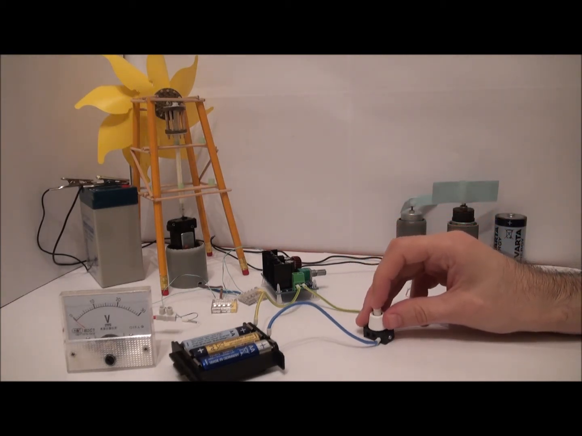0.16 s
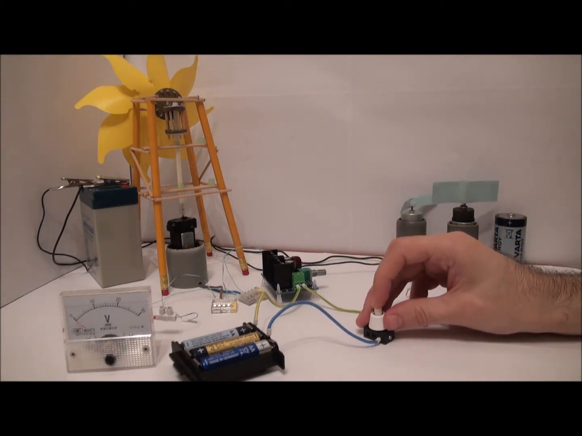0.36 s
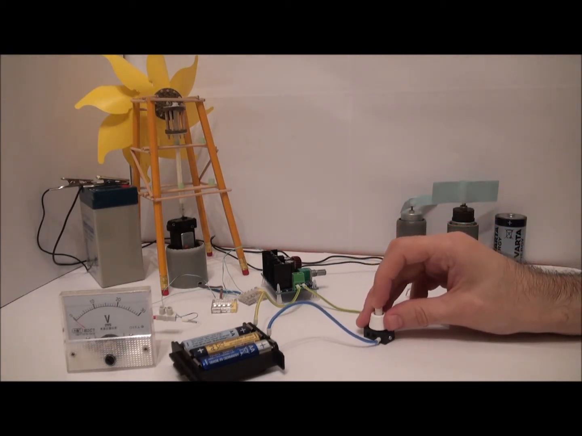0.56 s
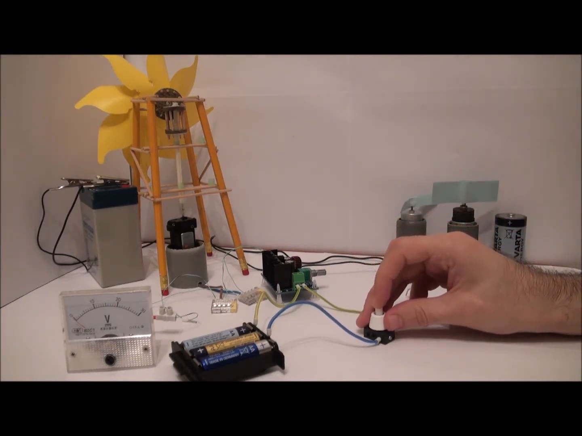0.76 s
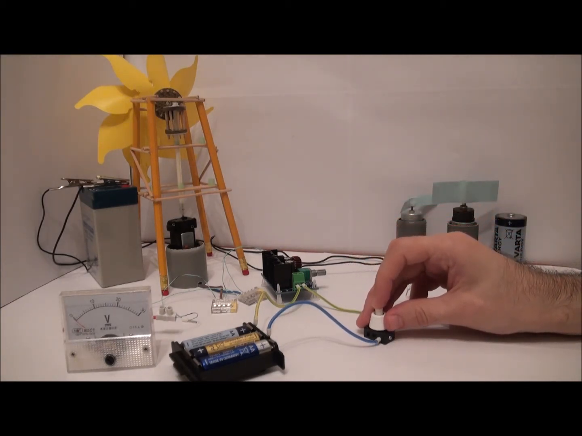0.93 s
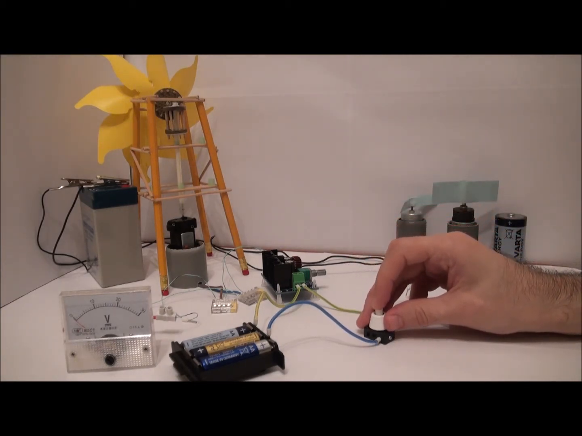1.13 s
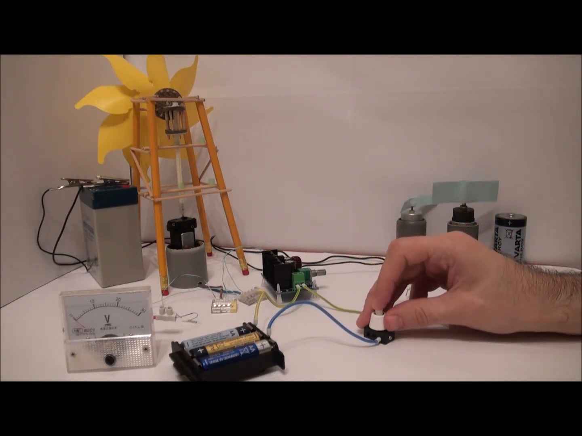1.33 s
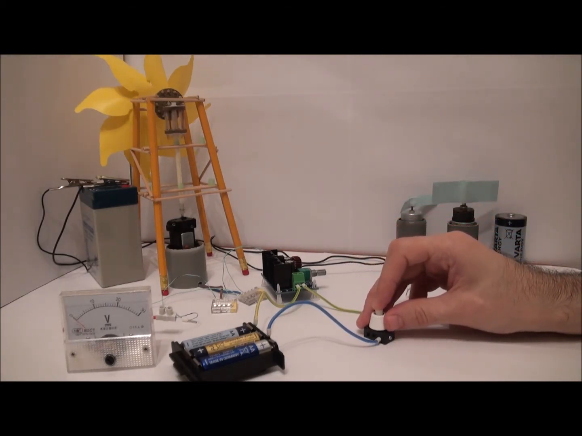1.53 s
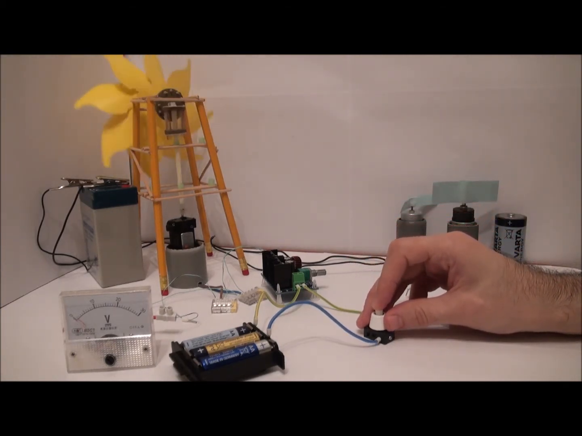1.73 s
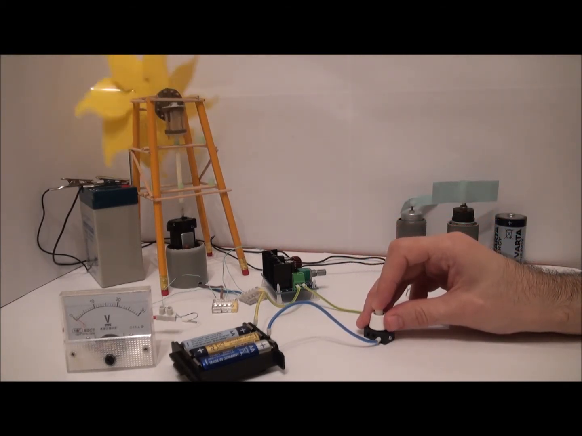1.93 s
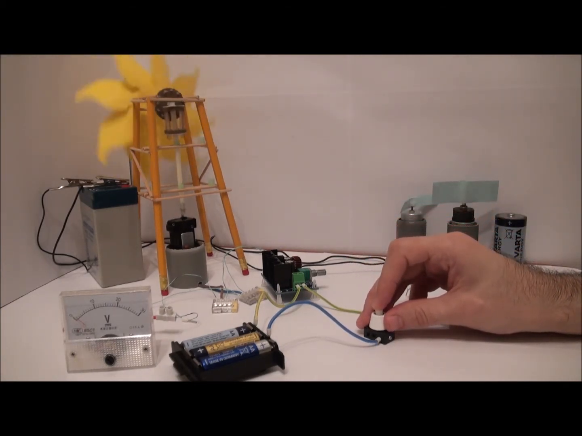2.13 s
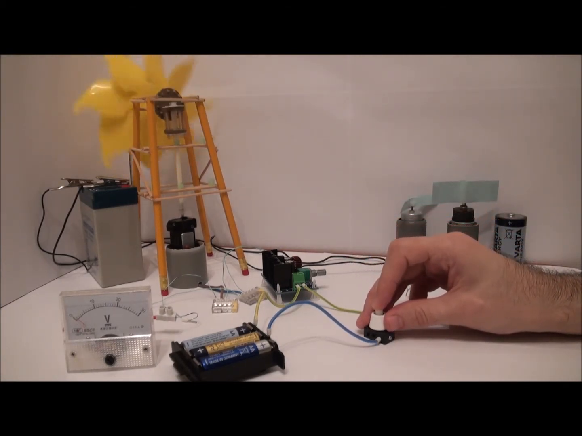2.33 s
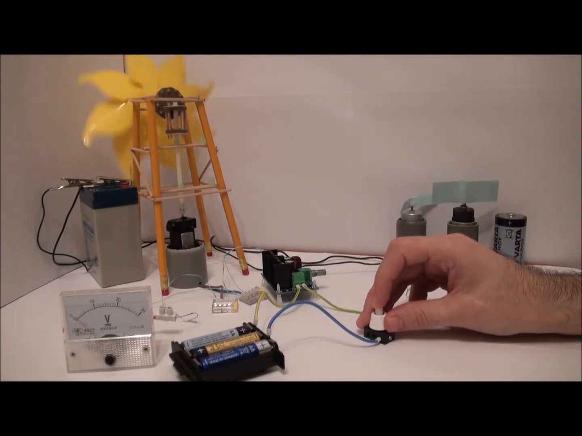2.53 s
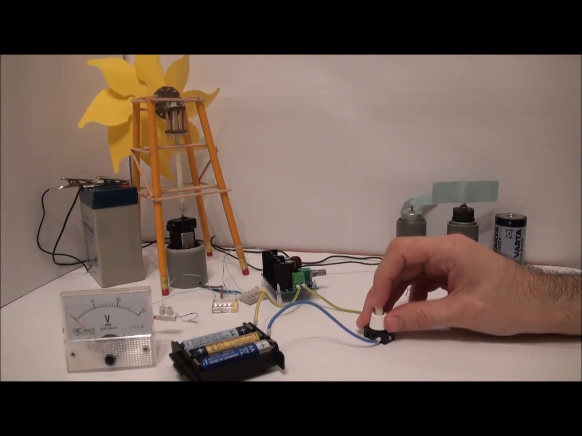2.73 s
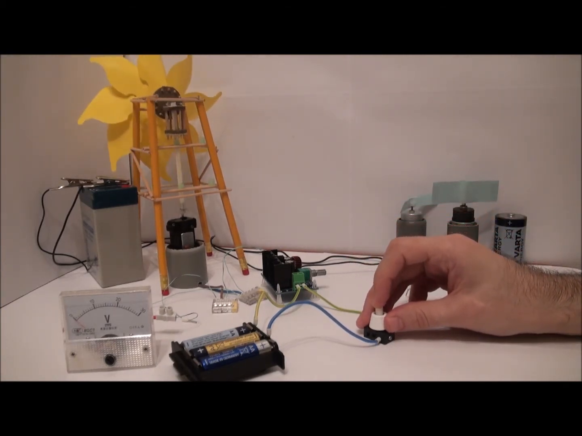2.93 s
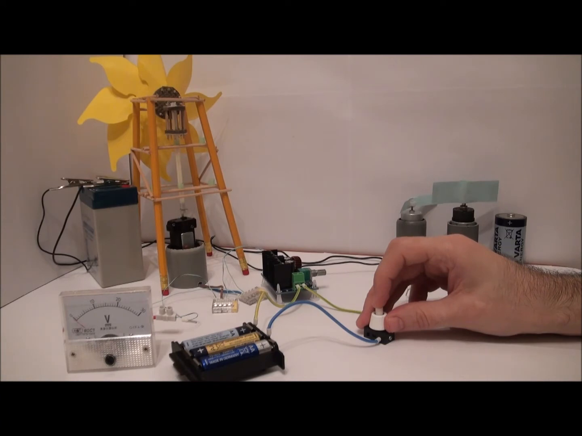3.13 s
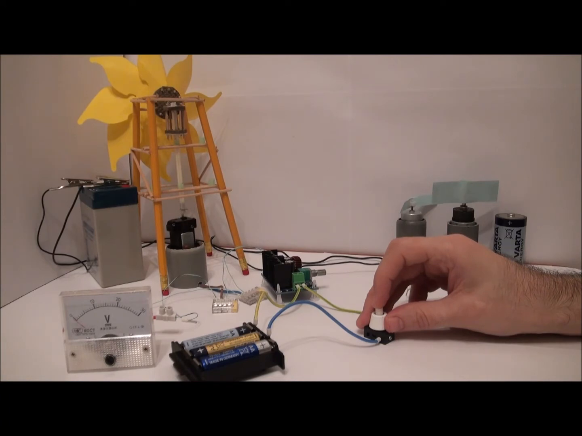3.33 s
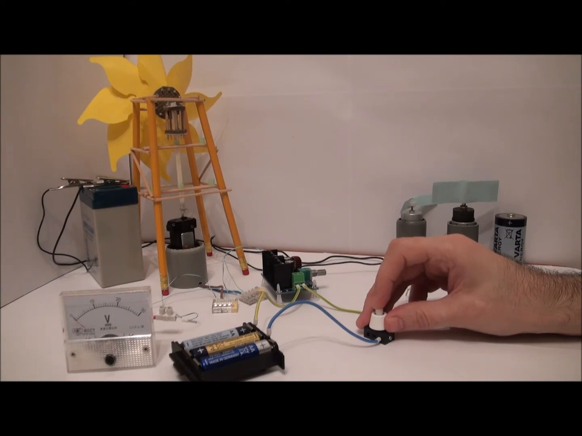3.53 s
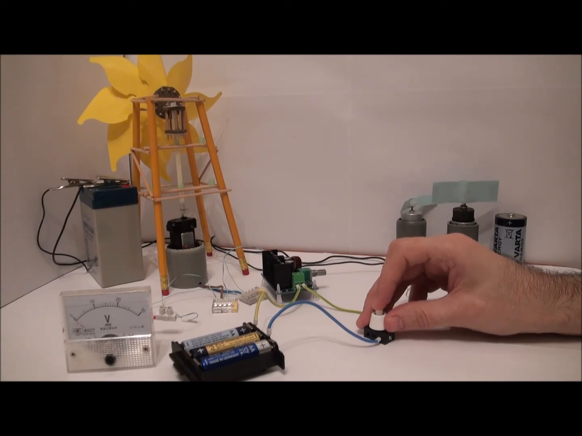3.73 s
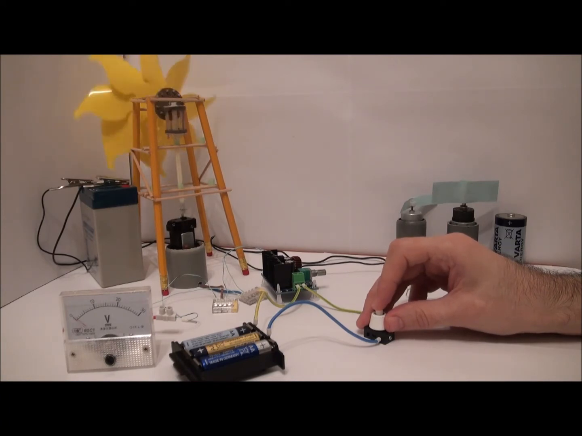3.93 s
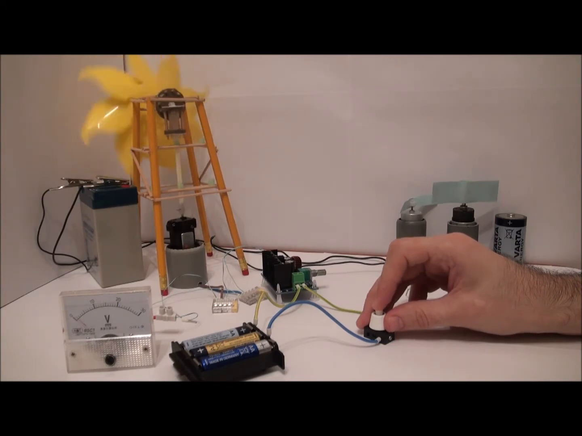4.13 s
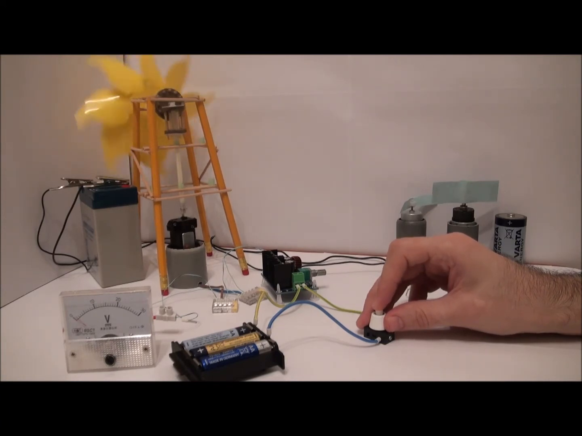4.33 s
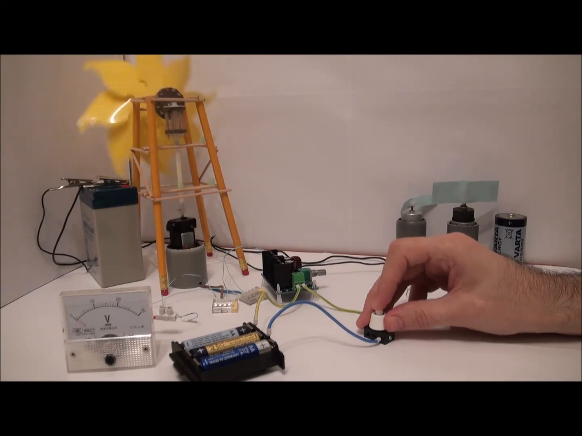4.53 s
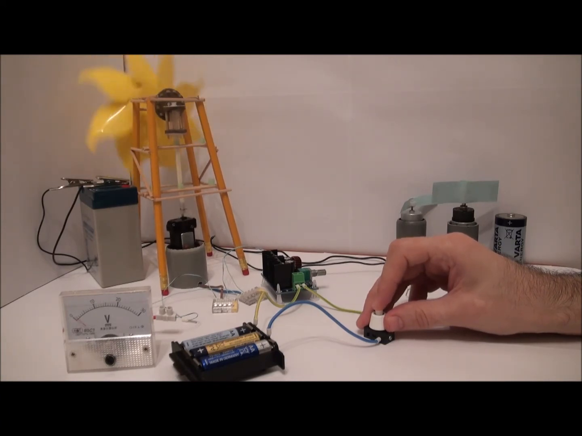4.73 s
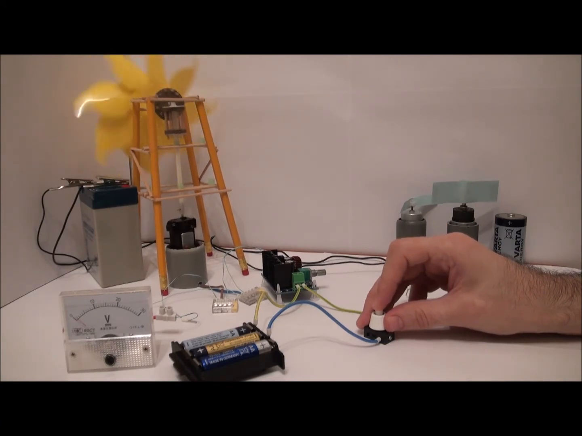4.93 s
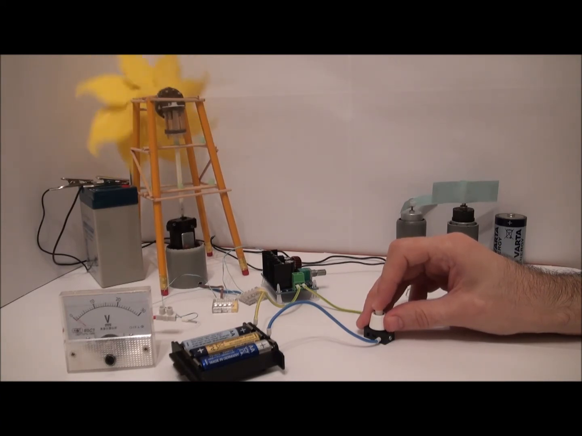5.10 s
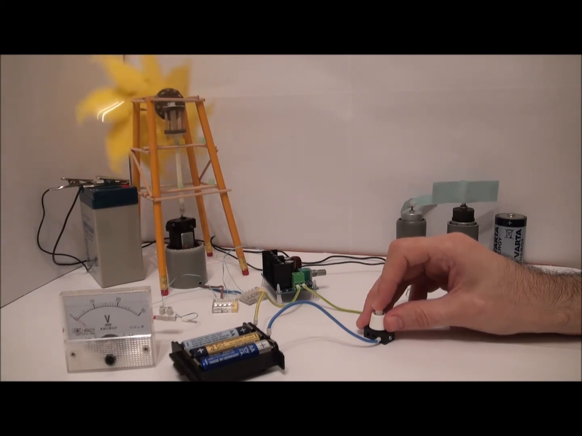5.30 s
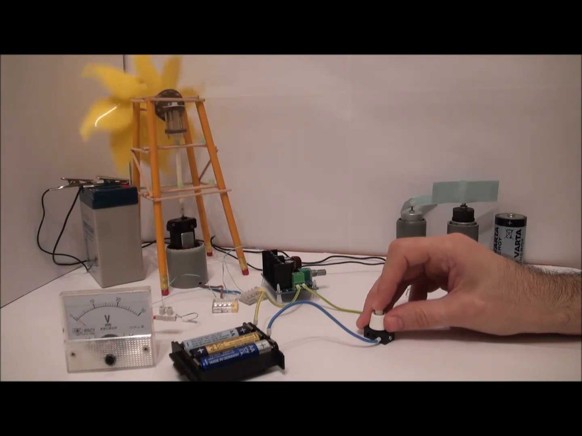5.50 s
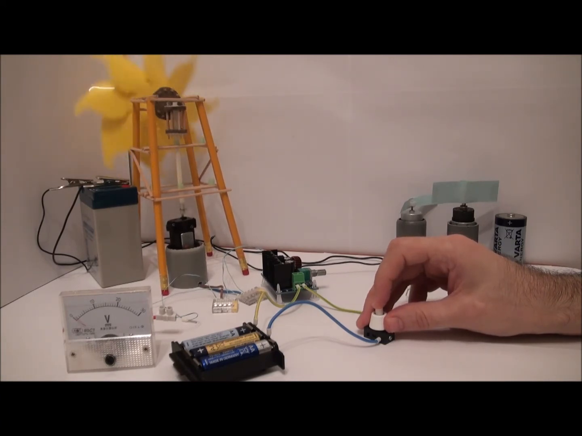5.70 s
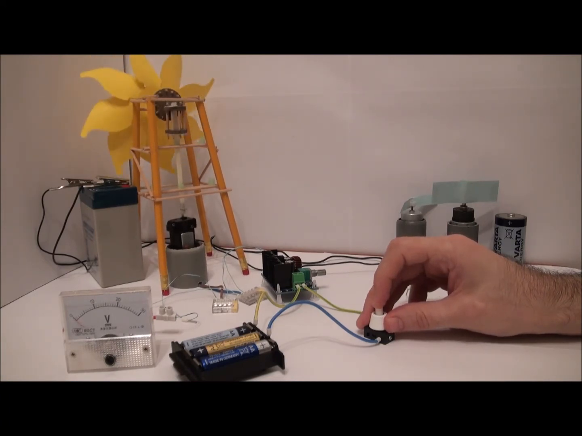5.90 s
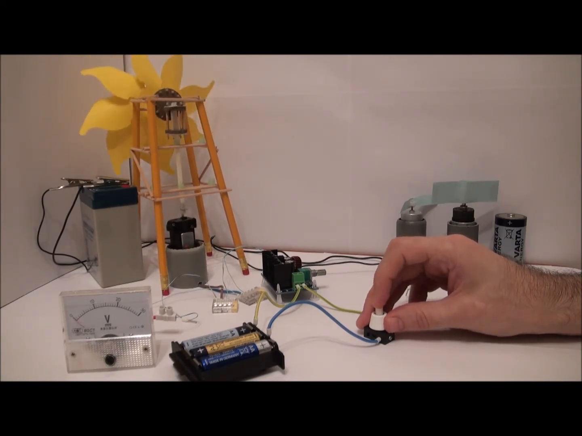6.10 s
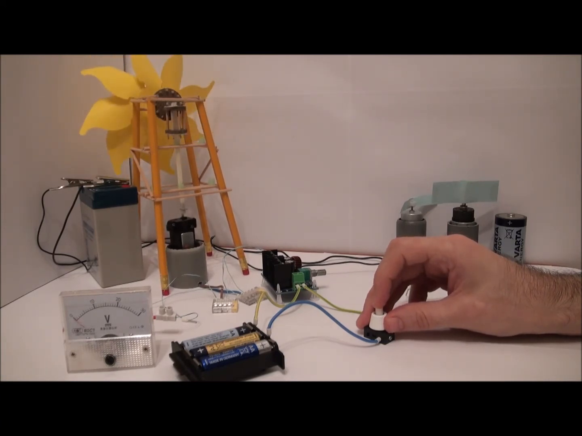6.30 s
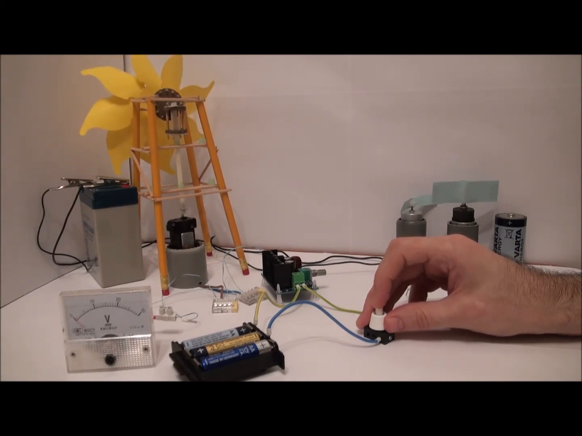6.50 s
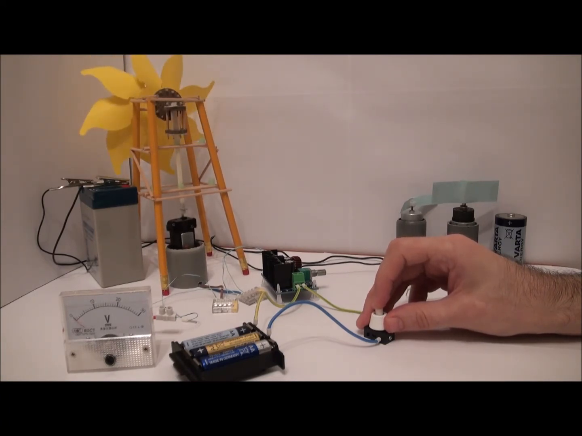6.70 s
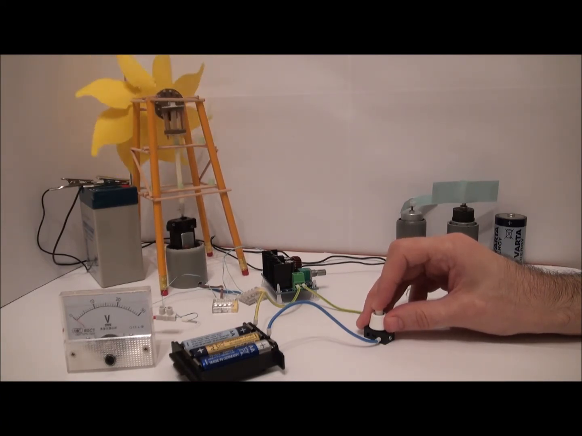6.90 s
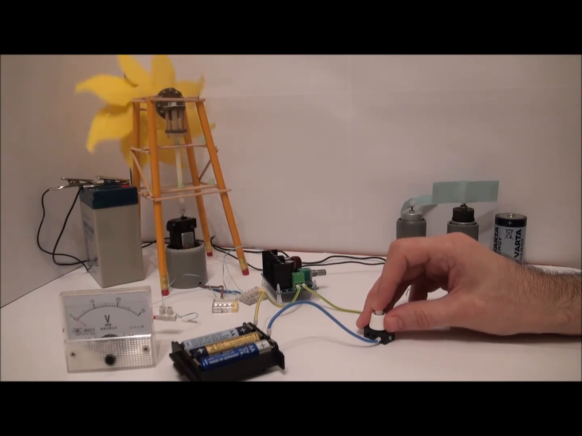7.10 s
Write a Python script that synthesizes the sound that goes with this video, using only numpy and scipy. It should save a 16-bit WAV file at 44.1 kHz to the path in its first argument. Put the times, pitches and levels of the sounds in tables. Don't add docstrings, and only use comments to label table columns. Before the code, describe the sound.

Close camera sound with steady hiss and a thin drive whine. A hand nudges a switch with dull little thumps, and slack plastic gears burst into bright, rough chattering with random cracks, hollow case ringing and a low table drone. Three runs: one second, nearly two seconds, then a brief one still running at the end. Each starts fast and coasts down quickly, with short room reflections.

```python
import sys
import numpy as np
from scipy import signal
from scipy.fft import rfft, irfft, next_fast_len
from scipy.io import wavfile
from scipy.ndimage import uniform_filter1d

SR = 44100
rng = np.random.default_rng(int(sys.argv[2]) if len(sys.argv) > 2 else 0)


def voltage_ratio(level):
    return 10 ** (np.asarray(level, float) / 20)


def int16_out(signal):
    q = np.round(np.clip(np.atleast_2d(signal).T, -1, 1) * 32767)
    wavfile.write(sys.argv[1], SR, q.astype(np.int16))


N = 315315

# pitch_hz, level_db
HISS_COLOUR = [(12, -63), (20, -13), (171, -9), (220, -3.5), (344, -4.5), (522, -7), (671, -4.5),
               (815, -10), (1680, -13), (1940, -14.5), (2940, -16), (3200, -14.5), (3670, -19),
               (12200, -22), (15700, -23)]
# pitch_hz, level_db
DRIVE_WHINE = [(96.9, -70), (231.5, -68.5), (296.1, -69.5), (344.5, -66.5), (689.1, -68), (1190, -76),
               (1260, -75), (1916, -73), (1970, -74.5), (2692, -79.5), (3198, -66.5), (4280, -79),
               (5292, -83), (9889, -79), (10923, -95), (11709, -76), (12102, -103), (12349, -90)]
# pitch_hz, width_hz, level_db
DRIVE_HUMS = [(122, 99, -70.5), (396.4, 10.6, -69.5), (486, 2.7, -73), (2060, 8, -93), (230.2, 16, -65.5),
              (4260, 160, -76.5), (12350, 700, -71)]
# time_s, hiss_db
CAMERA_GAIN = [(0.0, -67), (1.48, -64.5), (2.85, -59.5), (3.3, -62), (6.0, -60), (6.5, -61.5)]
# pitch_hz, fade_s
ROOM_FADE = [(100, 0.24), (1500, 0.28), (6000, 0.33), (14000, 0.12)]
# pitch_hz, side_over_mid_db
STEREO_WIDTH = [(60, -22), (110, -28), (200, -22), (380, -18), (700, -13.5), (1290, -14), (2380, -13.5),
                (4400, -13.5), (8120, -14.5), (15000, -5)]
# start_s, peak_db, thump_hz, rustle_over_peak_db
FINGER_NUDGES = [
    (0.004, -48.5, 312, -4),
    (0.947, -40, 231, -16),
    (0.964, -43, 118, -12),
    (1.151, -41, 121, -20),
    (1.508, -48, 233, -6),
    (2.803, -47, 352, -26),
    (2.842, -55, 237, -18),
    (3.671, -32.5, 120, -17),
    (5.836, -57, 684, -9),
    (6.759, -42.5, 124, -15),
]
# on_s, off_s, spin_up_s, coast_s, full_speed_chatter_db
MOTOR_RUNS = [
    (1.497, 2.503, 0.065, .13, -31),
    (3.804, 5.675, 0.035, .1, -29.5),
    (6.848, 7.3, 0.041, .11, -30.5),
]
# time_s, chatter_change_db
GEAR_LOAD = [(1.62, 2), (1.74, -5), (1.86, -2.5), (2.0, 0), (2.2, -1.5), (2.38, 2.5), (2.5, -2),
             (3.95, -0.7), (4.15, -.5), (4.55, 0), (4.68, 2.8), (4.8, -1.6), (5.15, 0.3), (5.28, 1),
             (5.45, 0), (5.6, -1.5), (5.68, -2.8), (7.0, -1)]
# pitch_hz, level_db
WHEEL_COLOUR = [(1120, -21.5), (1900, -4.5), (2000, -7), (2590, -2), (3230, -6), (3990, -1.5), (4360, -7),
                (6040, -2), (11800, -13), (15700, -31)]
# pitch_hz, width_hz, lift_db
WHEEL_RESONANCES = [(2640, 220, 2.5), (4220, 760, 1.5), (4720, 140, 7.5), (5900, 360, 1.5), (7550, 230, 5),
                    (8520, 190, 5.5), (11100, 790, 1.5), (12040, 500, 3.5)]
# pitch_hz, width_hz, level_db
CASE_RESONANCES = [(1377, 270, -4), (1596, 154, -0.5), (870, 1730, -14)]
# pitch_hz, level_db
TABLE_COLOUR = [(12, -47), (20, -7), (49, -31.5), (122, 4.5), (186, -10), (227, 0), (288, -10), (323, 1.5),
                (437, -6.5), (699, -5.5), (787, -11), (855, -4), (1100, -13), (1430, -49), (2420, -120)]
# start_s, peak_db, brightest_hz, case_ring_over_peak_db
HEAVY_KNOCKS = [(1.5566, -25.5, 2640, -9.5), (1.5798, -27.5, 4170, -11), (1.597, -13.5, 5630, -12.5),
                (1.6574, -19, 5930, -26), (1.6714, -20, 4020, -11.5), (1.71, -39, 5960, -16),
                (1.7948, -20, 5880, -22), (1.8108, -17, 5620, -23), (1.8418, -11.5, 4800, -10.5),
                (1.8561, -17, 6930, -5.5), (1.8771, -8, 3860, -16), (1.9518, -9.5, 7320, -12.5),
                (2.0037, -19, 4730, -21), (2.0556, -19, 5900, -20), (2.0632, -15.5, 3740, -24),
                (2.1095, -13, 4750, -24), (2.2343, -8.5, 3870, -14.5), (2.264, -13.5, 3420, -22),
                (2.288, -21, 8350, -23), (2.3354, -16.5, 6770, -13.5), (2.3674, -14.5, 4040, -20),
                (2.379, -12, 4940, -14), (2.4201, -14.5, 7360, -20), (2.4358, -14, 4850, -12),
                (2.4909, -16.5, 4770, -22), (2.5103, -36, 6690, -11),
                (3.8782, -14.5, 2540, -15), (3.8933, -18.5, 6060, -20), (3.907, -11, 5960, -10.5),
                     (3.9512, -13, 4020, -16.5), (3.9784, -10, 4980, -14), (4.049, -7.5, 4770, -20),
                     (4.0898, -14.5, 3960, -13), (4.1886, -9, 6080, -24), (4.2288, -14, 4800, -8),
                     (4.334, -14.5, 8470, -14), (4.3574, -12, 4640, -25), (4.4237, -13.5, 3960, -11),
                     (4.4874, -16.5, 6060, -26), (4.5073, -18, 6910, -8), (4.597, -12, 5900, -18),
                     (4.6102, -11, 5700, -6), (4.6711, -14, 6260, -12), (4.7321, -17.5, 6063, -12),
                     (4.7569, -13.5, 6300, -11), (4.8669, -13, 6656, -13), (4.8914, -12, 5900, -9),
                     (4.9516, -24, 5810, -21), (5.008, -15, 6270, -13), (5.0234, -12.5, 6000, -16),
                     (5.1471, -11, 6600, -8.5), (5.1908, -12, 3980, -19), (5.3137, -15, 6130, -3.5),
                     (5.4052, -15.5, 5850, -28), (5.5338, -16, 5920, -15), (5.6515, -13.5, 2710, -15.5),
                (6.884, -28, 4580, -10), (6.8993, -18, 4830, -14.5), (6.9097, -16.5, 5940, -20),
                    (6.9287, -16.5, 4000, -9.5), (6.94, -27, 6680, -17), (6.9658, -11, 5600, -10),
                    (6.9874, -16.5, 6790, -20), (7.011, -15, 4990, -11.5), (7.0264, -30, 6060, -11),
                    (7.0455, -22, 5950, -22), (7.0623, -15, 5990, -16.5), (7.092, -19, 6450, -18),
                    (7.1037, -14, 6420, -16), (7.1315, -16, 6680, -4), (7.1444, -15, 5340, -11)]
# start_s, peak_db, brightest_hz, case_ring_over_peak_db
START_STOP_KNOCKS = [(1.5186, -28, 2630, -28), (1.526, -22, 2570, -28), (1.534, -33, 3990, -13),
                     (2.6417, -26, 2640, -16), (2.6484, -32, 6000, -23), (2.6757, -24.5, 8360, -11),
                     (2.6788, -22.5, 2980, -13), (3.811, -31, 2620, -21), (3.8318, -31, 4580, -5),
                     (5.647, -15, 4000, -25), (5.6645, -22, 5700, -29), (5.6696, -15.5, 4730, -23),
                     (5.676, -15.5, 4760, -13), (5.7567, -30, 2667, -15), (5.7927, -21, 8340, -20),
                     (5.793, -26.5, 2900, -20), (5.7967, -28, 8370, -22), (6.855, -28.5, 4400, -26),
                     (6.8582, -31.5, 2640, -18)]

CHATTER_POWER = 2.33


def unit(x):
    return x / np.sqrt(np.mean(x ** 2))


def peak(x):
    return x / np.abs(x).max(axis=1, keepdims=True)


def slope(table, hz):
    at, value = np.transpose(table)
    return np.interp(np.log(hz + 1), np.log(at), value)


def bell(hz, centre_hz, width_hz):
    return 1 / np.sqrt(1 + ((hz ** 2 - centre_hz ** 2) / ((hz + 1) * width_hz)) ** 2)


def colour(x, gain):
    size = next_fast_len(x.shape[-1] + 4096)
    cepstrum = irfft(np.log(gain(np.fft.rfftfreq(size, 1 / SR)) + 1e-7), size)
    cepstrum[..., 1:size // 2] *= 2
    cepstrum[..., size // 2 + 1:] = 0
    return irfft(rfft(x, size) * np.exp(rfft(cepstrum)), size)[..., :x.shape[-1]]


def walk(rate):
    hold = int(SR / rate)
    levels = np.repeat(rng.standard_normal(N // hold + 1), hold)
    smooth = uniform_filter1d(uniform_filter1d(levels, hold), hold)
    return unit(smooth[:N])


def place(times, shapes):
    out = np.zeros(N + shapes.shape[1])
    for s, shape in zip(times, shapes):
        start = int(s * SR)
        out[start:start + len(shape)] += shape
    return out[:N]


def camera():
    gain_s, gain_db = np.transpose(CAMERA_GAIN)
    t = np.arange(N) / SR
    hiss = colour(rng.standard_normal((2, N)), lambda hz: voltage_ratio(slope(HISS_COLOUR, hz)))
    hiss = hiss / np.std(hiss[0]) * voltage_ratio(-56.0)
    drive = np.zeros(N)
    for pitch_hz, db in DRIVE_WHINE:
        wavering = np.sqrt(2) * voltage_ratio(db + 1.2 * walk(30))
        drive += wavering * np.sin(2 * np.pi * (pitch_hz * t + rng.random()))
    for pitch_hz, width_hz, db in DRIVE_HUMS:
        hum = colour(rng.standard_normal(N), lambda hz: bell(hz, pitch_hz, width_hz) ** 2)
        drive += voltage_ratio(db) * unit(hum)
    noise = np.array([hiss[0] + drive, hiss[1] * voltage_ratio(10.0)])
    return noise * voltage_ratio(np.interp(t, gain_s, gain_db) + 61.5)


def room(x, count=8):
    t = np.arange(SR // 2) / SR
    tail = 0
    for hz in 100 * 2. ** np.arange(8):
        band = colour(rng.standard_normal((count, 2, len(t))), lambda f: bell(f, hz, hz) ** 2)
        tail = tail + band * voltage_ratio(-60 * t / slope(ROOM_FADE, hz))
    tail = tail * np.clip((t - .002) / 0.0035, 0, 1)
    tail = tail / np.sqrt(np.sum(tail[:, 0] ** 2) / count)
    turn = np.repeat(rng.integers(0, count, N // 512 + 1), 512)[:N]
    share = uniform_filter1d(1. * (turn == np.arange(count)[:, None]), 128)
    size = next_fast_len(N + len(t))
    echoes = np.einsum("kf,kcf->cf", rfft(share * x, size), rfft(tail, size))
    return irfft(echoes, size)[:, :N]


def nudges():
    s, db, thump_hz, rustle_db = np.transpose(FINGER_NUDGES)[:, :, None]
    t = np.arange(4096) / SR
    noise = rng.standard_normal((len(s), 2, len(t)))
    thump = colour(noise[:, 0] * np.exp(-t / 0.001), lambda hz: bell(hz, thump_hz, 40))
    rustle = colour(noise[:, 1] * np.exp(-t / 0.009), lambda hz: bell(hz, 1400, 1800) ** 2)
    return place(s[:, 0], voltage_ratio(db - 5.0) * (peak(thump) + voltage_ratio(rustle_db + 12.0) * peak(rustle)))


def motor():
    t = np.arange(N) / SR
    on, off, spin_s, coast_s, db = np.transpose(MOTOR_RUNS)[:, :, None]
    spin_up = 1 - np.exp(-np.clip(t - on, 0, None) / spin_s)
    coast = np.exp(-np.clip(t - off, 0, None) / coast_s)
    speed = spin_up * coast
    return speed.max(axis=0), db[speed.argmax(axis=0), 0]


def wheel_gain(hz):
    lift_db = sum(db * bell(hz, f, w) ** 2 for f, w, db in WHEEL_RESONANCES)
    return voltage_ratio(slope(WHEEL_COLOUR, hz) + lift_db)


def case_gain(hz):
    power = sum((voltage_ratio(db) * bell(hz, f, w)) ** 2 for f, w, db in CASE_RESONANCES)
    return np.sqrt(power) * bell(hz, 1810, 2550)


def table_gain(hz):
    return voltage_ratio(slope(TABLE_COLOUR, hz))


def taps(count=900):
    taps_per_s, tap_over_chatter_db, scatter_db = 70, 10, 3
    speed, db = motor()
    chance = rng.standard_normal((count, 4)).T
    s = np.cumsum(np.exp(.5 * chance[0])) / taps_per_s
    at = np.minimum((s * SR).astype(int), N - 1)
    peak_db = db[at] + tap_over_chatter_db + scatter_db * np.clip(chance[1], -2, 1.5)
    peak_db = peak_db + 20 * CHATTER_POWER * np.log10(speed[at] + 1e-6)
    brightest_hz = 5800 * 2 ** (0.36 * chance[2])
    case_db = -16.5 + 5 * chance[3]
    rows = np.transpose([s, peak_db, brightest_hz, case_db])
    return rows[(speed[at] > .3) & (s < N / SR)]


def knocks():
    heavy = np.array(HEAVY_KNOCKS + START_STOP_KNOCKS)
    s, db, brightest_hz, case_db = np.vstack([heavy, taps()]).T[:, :, None]
    t = np.arange(1024) / SR
    noise = rng.standard_normal((len(s), 2, len(t)))
    treble_db = -13 + 0.84 * (db + 17.5) + 3 * noise[:, 0, :1]
    blow = (1 - np.exp(-t / 0.00026)) * np.exp(-(t / 0.0022) ** 2)

    def crack_gain(hz):
        tilt_db = 0.45 * (treble_db + 19.0) * np.clip(np.log2(hz / 5000 + .01), -1.5, 1)
        bright_part = 1 + 1.63 * bell(hz, brightest_hz, 480)
        return wheel_gain(hz) ** 0.62 * voltage_ratio(tilt_db) * bright_part / (1 + (hz / 13500) ** 6)

    crack = colour(noise[:, 0] * blow, crack_gain)
    ring = colour(noise[:, 1] * blow, case_gain)
    fade_out = np.hanning(2 * len(t))[len(t):]
    thud = colour(noise[:, 1] * np.exp(-t / 0.0069), table_gain) * fade_out
    knock = peak(crack) + voltage_ratio(case_db + 4.0) * peak(ring) + voltage_ratio(-22) * peak(thud)
    return place(s[:, 0], voltage_ratio(db + 0.5) * knock)


def teeth(per_s, scatter_db, touch_s, wobble):
    shaft_hz = 60.54
    turn = 2 * np.pi * np.cumsum(shaft_hz * (1 + .02 * walk(4))) / SR
    odds = per_s / SR * (1 + wobble * np.cos(turn))
    chance = rng.random((N, 2)).T
    hits = (chance[0] < odds) * voltage_ratio(-scatter_db * np.log(chance[1] + .03))
    return signal.lfilter([1], [1, -np.exp(-1 / (touch_s * SR))], hits)


def chatter():
    speed, db = motor()
    shared = teeth(300, 2.9, 0.0024, .4)
    noise = rng.standard_normal((3, N))
    wheels = unit(colour(noise[0] * (shared + 1.2 * teeth(600, 3.5, 0.0009, 0.38)), wheel_gain))
    case = unit(colour(noise[1] * (shared + 1.4 * teeth(700, 1.6, 0.0006, .3)), case_gain))
    table = unit(colour(noise[2] * (unit(shared) + 1.1), table_gain))
    table = table * voltage_ratio(1.1 * walk(9))
    gears = wheels * voltage_ratio(-2) * speed ** CHATTER_POWER + case * voltage_ratio(-13.5) * speed ** 2.6
    drone = table * voltage_ratio(-14.5) * speed ** 1.27
    load_db = np.interp(np.arange(N) / SR, *np.transpose(GEAR_LOAD))
    return (gears * voltage_ratio(load_db) + drone) * voltage_ratio(db)


def scene():
    near = chatter() + knocks() + nudges()
    wet = room(near) * voltage_ratio(-5)
    own = camera()
    mid = near * voltage_ratio(-1.5) + wet[0] + own[0]
    side = colour(wet[1] * voltage_ratio(2.0) + own[1], lambda hz: voltage_ratio(slope(STEREO_WIDTH, hz)))
    side = side + .13 * colour(near, lambda hz: bell(hz, 8800, 8000))
    side = colour(side, lambda hz: 1 / (1 + (hz / 11150) ** 60))
    return np.array([mid + side, mid - side])


def roll_off(x):
    return signal.sosfilt(signal.butter(12, 15810, fs=SR, output="sos"), x)


def record(dry):
    low_pass = signal.ellip(10, .2, 80, 15850, fs=SR, output="sos")
    mix = signal.sosfilt(low_pass, dry)
    return roll_off(mix)


dry = scene()
out = record(dry)
int16_out(out)
```